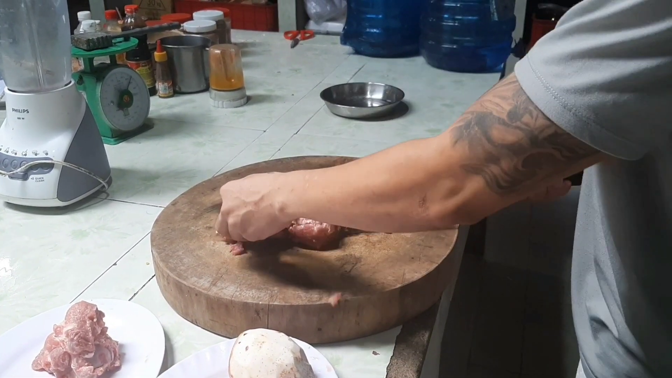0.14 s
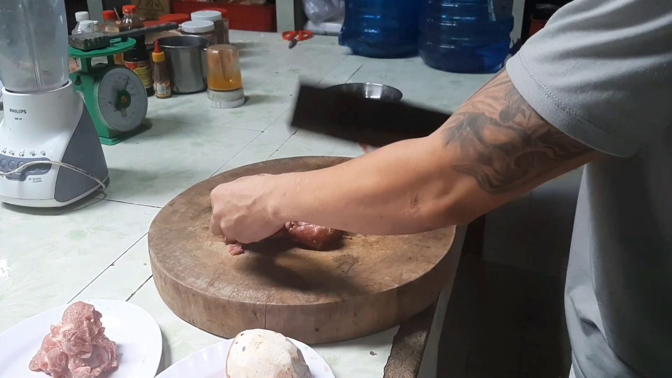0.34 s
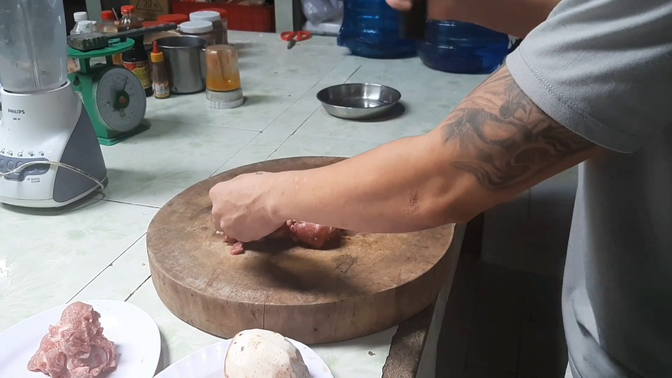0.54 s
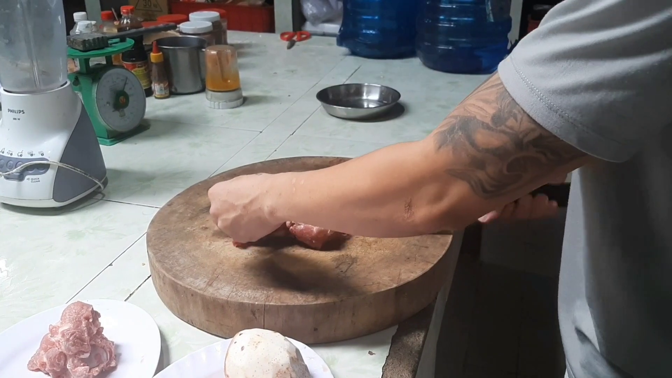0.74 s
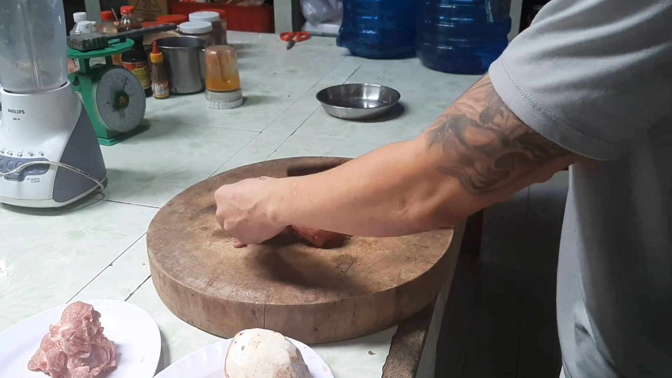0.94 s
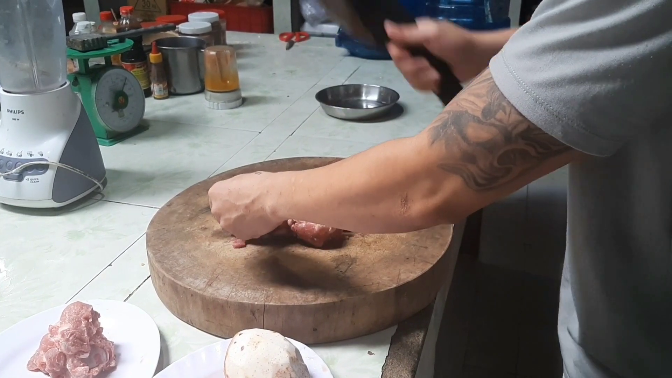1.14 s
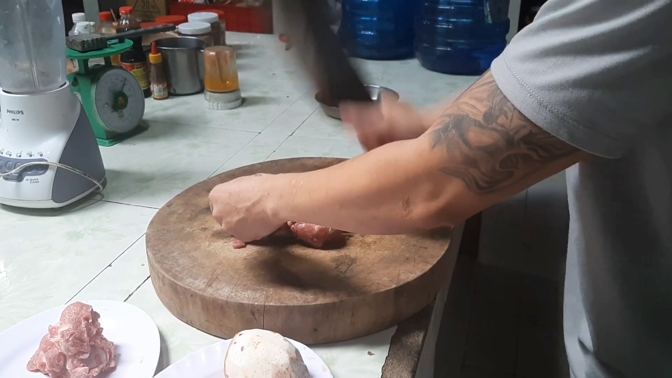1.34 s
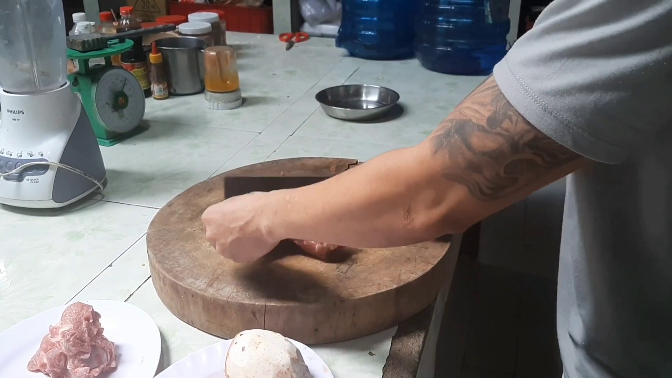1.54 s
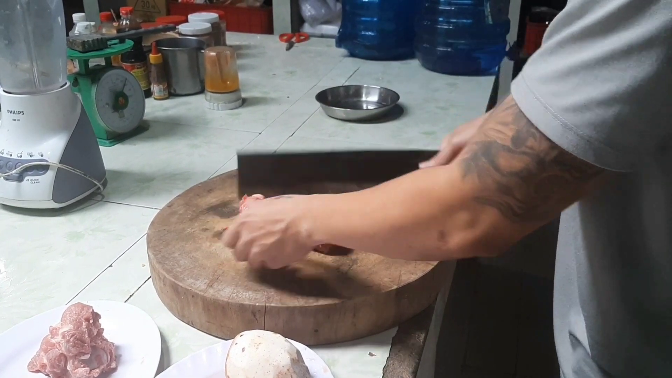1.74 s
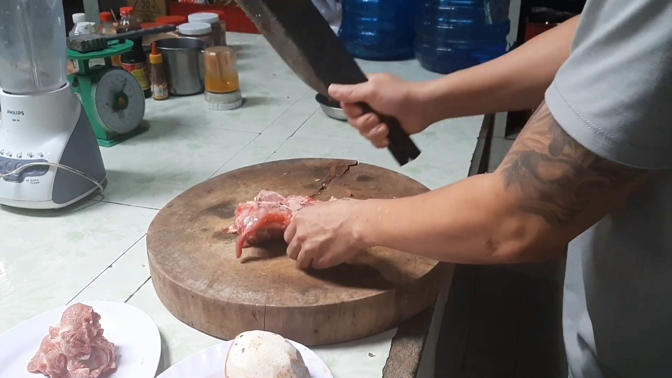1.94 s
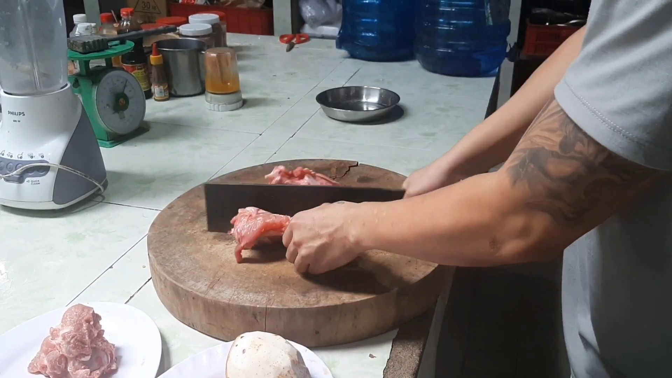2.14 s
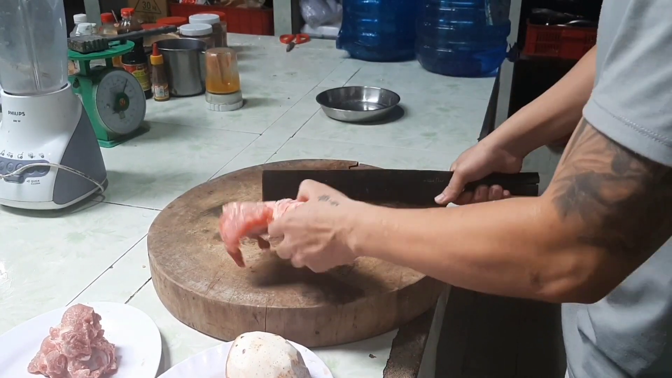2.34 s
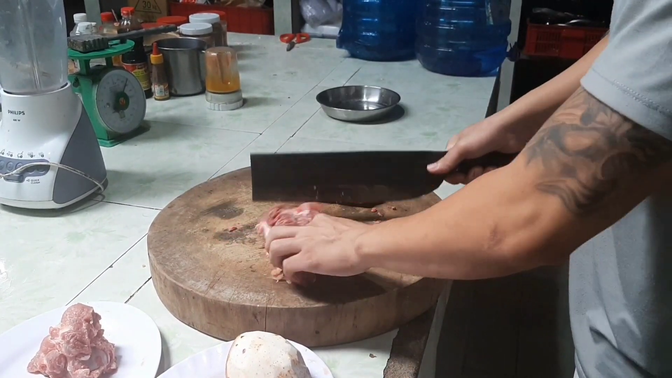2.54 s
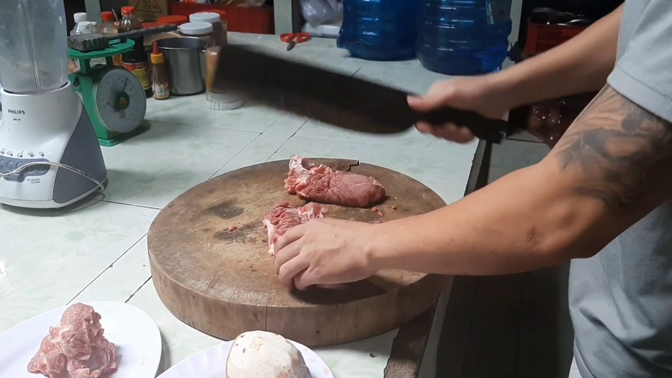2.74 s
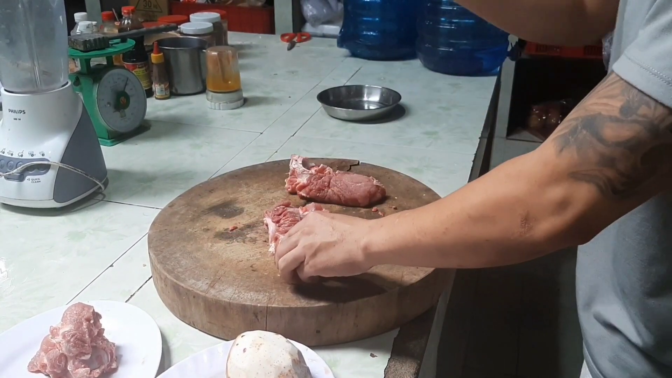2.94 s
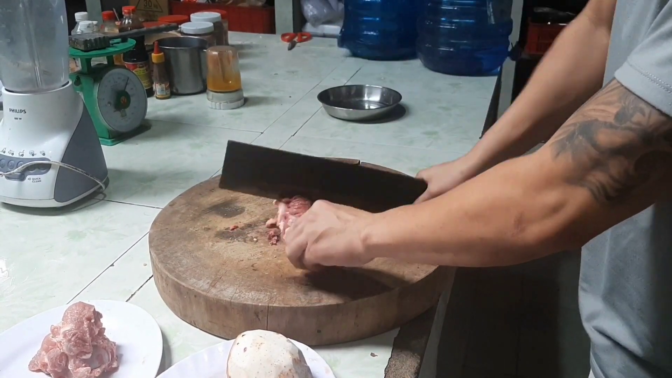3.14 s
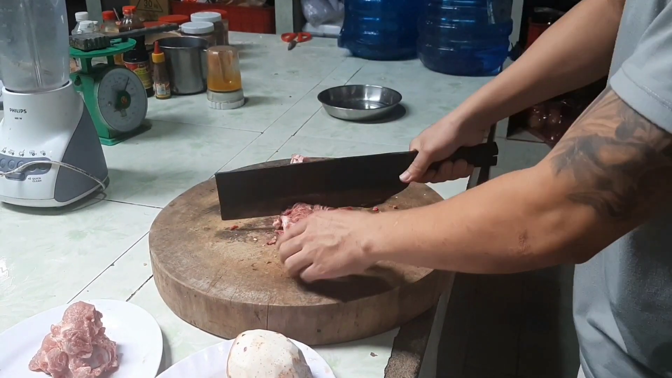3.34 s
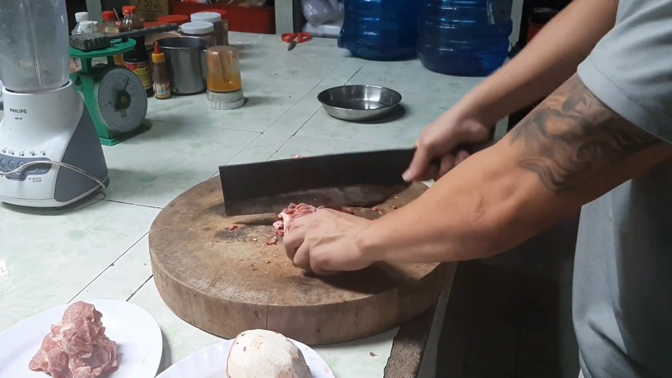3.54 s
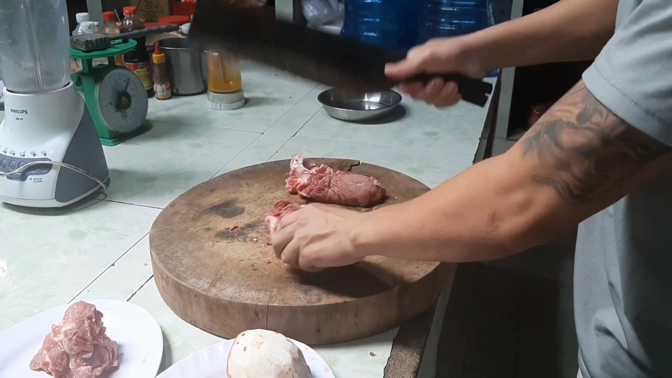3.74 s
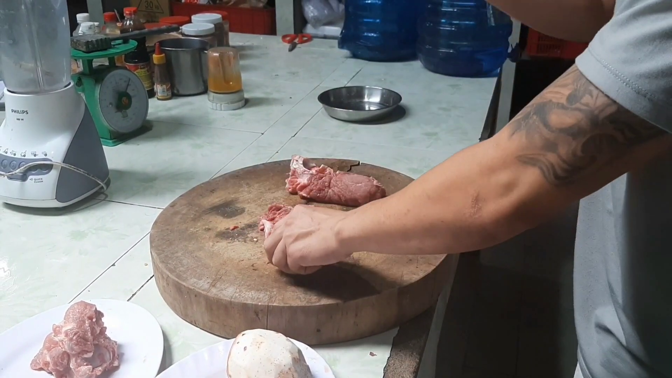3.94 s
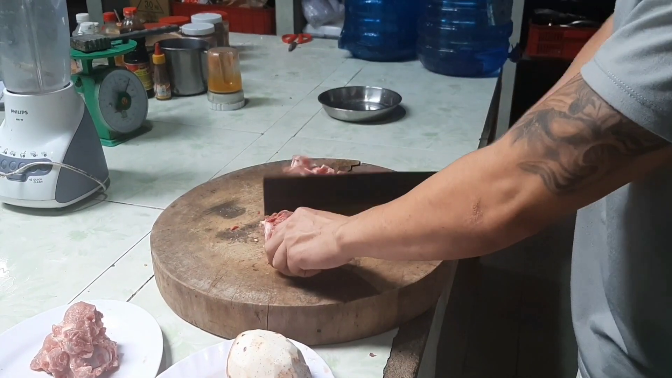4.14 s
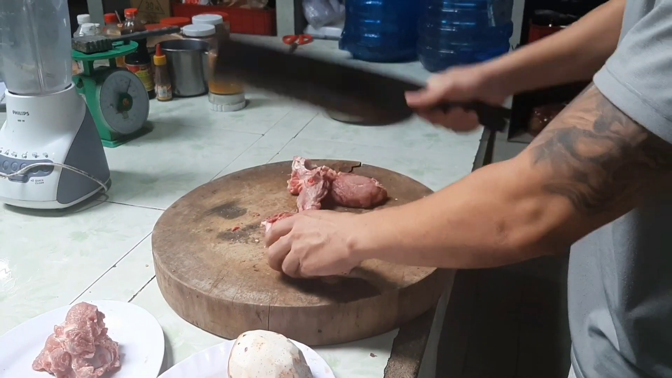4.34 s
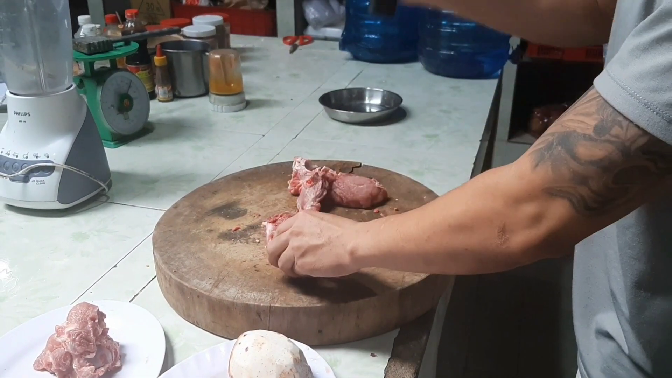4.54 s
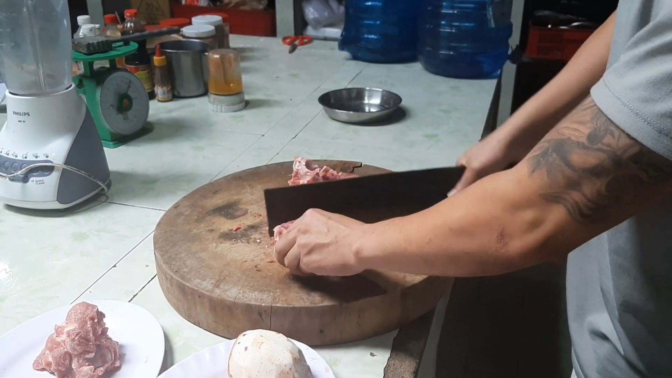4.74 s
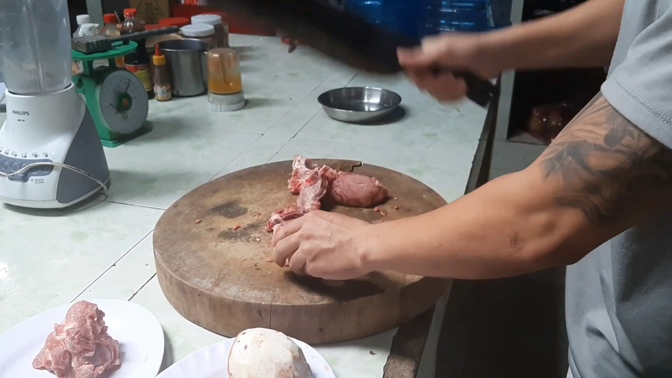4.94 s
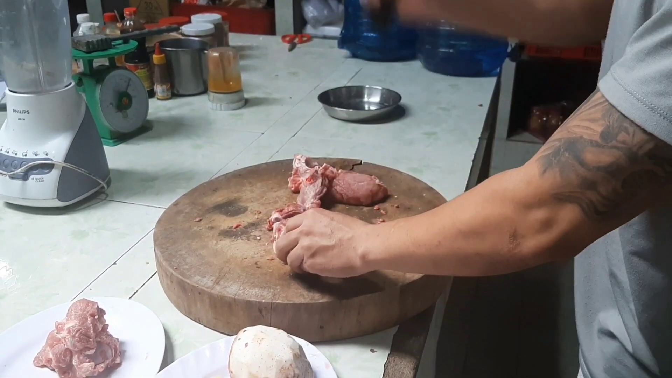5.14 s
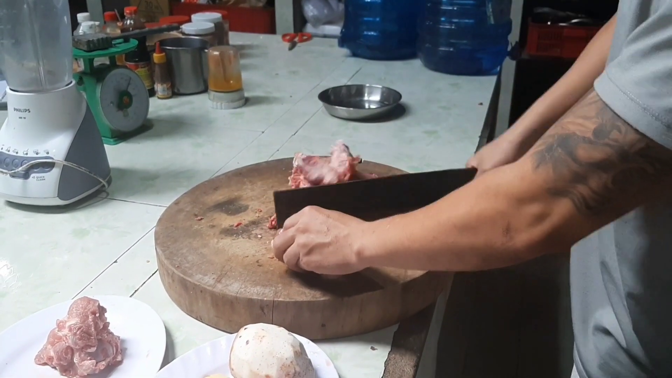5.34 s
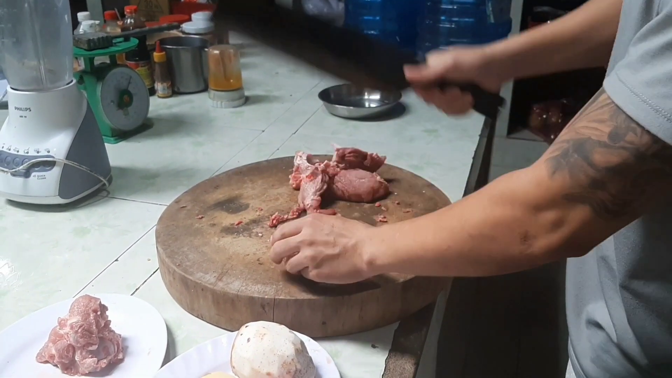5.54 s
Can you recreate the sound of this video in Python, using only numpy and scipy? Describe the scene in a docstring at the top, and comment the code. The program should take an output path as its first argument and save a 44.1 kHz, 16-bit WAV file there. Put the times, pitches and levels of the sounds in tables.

```python
"""A tiled kitchen: a heavy cleaver chops bone on a thick wooden block, close to a phone on the counter.
Each blow is a burst of noise as the bone cracks, then decaying modes as the edge knocks the block.
Filtered noise, one echo pattern per blow, lets the hard walls ring on for about half a second.
Small wet noise ticks follow one blow; behind lie a fan's wavering hum, its hiss, and the rumble
and short sine thumps of its draught on the two microphone ports."""
import sys
import numpy as np
from scipy import signal
from scipy.fft import rfft, irfft
from scipy.io import wavfile
from scipy.ndimage import uniform_filter1d

SR = 44100
rng = np.random.default_rng(int(sys.argv[2]) if len(sys.argv) > 2 else 0)


def generate_wav(sig):
    """Save sig (samples, or channels by samples) to the path in sys.argv[1] as 16-bit PCM at SR."""
    pcm = np.round(np.clip(np.atleast_2d(sig).T, -1, 1) * 32767).astype(np.int16)
    wavfile.write(sys.argv[1], SR, pcm)


N = 250488

# blows of the cleaver: (edge meets bone [s], crack level [dB], crack length [ms], crack tilt [dB/octave],
#   edge meets block after [ms], weight of blow [dB], knock pitch [ratio],
#   knock level near [dB], knock level to walls [dB], body level [dB],
#   thud level near [dB], thud level to walls [dB], thud tilt [dB/octave],
#   blade level [dB], upper blade modes [dB])
CHOPS = [(0.1334, -12, 1, -1.1, 3.83, -14, 1.01, -4.5, -16.5, -18, -49.5, -36, -10, -40.5, -10),
         (0.8031, -17.5, 4.9, -0.6, 4.2, -15.5, 0.96, -5, -27.5, -9, -31, -33, -5.5, -37.5, -6.5),
         (1.5005, -15, 3.75, -0.5, 6, -17.5, 1.05, -6.5, -32, -3.5, -33, -32.5, -3, -50, -4),
         (2.1808, -21, 7.5, -2.8, 6.7, -17, 1.016, -6.5, -11, -14, -25, -32.5, 0, -39, -15),
         (3.2318, -20, 3.9, -0.9, 0.62, -25, 0.97, -12.5, -46, -15.5, -11, -23.5, -4, -58, -7),
         (4.206, -11, 2.8, -4, 2.98, -15.5, 0.79, -5, -19.5, -19, -38, -27.5, 3, -44, -14.5),
         (4.7695, -13, 3.8, -3, 0.86, -14, 0.93, -4.5, -35, -10.5, -22, -24.5, 8.5, -57, 4),
         (5.3435, -13.5, 3.4, 0.2, 3.26, -15.5, 1, -4.5, -26.5, -11, -26, -32, -7, -41, -6.5),
         (5.4160, -22, 3.1, -1, 0.55, -26.5, 0.97, -1, -17, -23, -52, -39, -12, -63, 13)]


def chops():
    """Superposition: crack, block and counter reach the ports directly, then the walls return the blow."""
    out = np.zeros((2, N))
    for (s, crack_db, crack_ms, tilt_db, wait_ms, blow_db, pitch, knock_db, wall_knock_db, body_db,
         thud_db, wall_thud_db, thud_tilt_db, blade_db, upper_db) in CHOPS:
        wait_s = wait_ms / 1000
        modes = block_modes(pitch, tilt_db, thud_tilt_db)
        crack = bone_crack(crack_db, crack_ms / 1000, tilt_db)
        wood = block(modes, [knock_db, body_db, thud_db], wait_s)
        add(out, crack + wood, s)
        add(out, counter(blow_db), s)
        reflected = walls(modes, tilt_db, blow_db, wall_knock_db, wall_thud_db, blade_db, upper_db)
        add(out, reflected, s + wait_s)
    return out


# relative spectrum of the splintering bone: (frequency [Hz], level [dB per Hz])
CRACK = [(240, -35.5), (400, -4), (1760, -4), (3930, -9.5), (5110, -8), (7870, -16), (9180, -24),
         (10900, -14.5), (12700, -10), (14800, -10.5), (16000, -36)]
CRACK_RISE_S, GRIT_T60_S = .0015, 0.029


def bone_crack(level_db, length_s, tilt_db):
    """Fracture noise: bone splinters while the edge travels through it, then the grit dies fast."""
    t = np.arange(16384) / SR
    rise = np.clip(t / CRACK_RISE_S, 0, 1)
    decay = undb(-60 * np.maximum(t - length_s, 0) / GRIT_T60_S)
    return diffuse(len(t), CRACK, tilt_db) * rise * decay * undb(level_db)


# modes of the block, its main knock and the modes beside it: (frequency [Hz], level [dB], t60 [s])
KNOCK, KNOCK_SIDES = [(1526, 0.0076, 0.021)], [(1075, -4, 0.015), (1920, -8, 0.026), (2460, -2.5, 0.011)]
# body modes of the block and counter: (frequency [Hz], level [dB], t60 [s])
BODY = [(360, -15, 0.052), (458.5, -4.5, 0.068), (624, -2, 0.035), (890, -3, 0.012)]
# low thud modes of the block and counter: (frequency [Hz], level [dB], t60 [s])
THUD = [(101.7, -8, 0.2), (183.8, -1.5, 0.15), (216, -2, 0.11), (267, -2, 0.072)]
KNOCK_SIDES_DB = -4.3
# the duller the crack, the more the upper body modes sound
BODY_TILT_DB, BODY_TILT_PER_CRACK_TILT = -1.5, -3.5  # dB per octave; ratio


def block_modes(pitch, crack_tilt_db, thud_tilt_db):
    """Modal excitation: each blow weights the knock, body and thud modes anew."""
    knock = shift(KNOCK, pitch) + shift(KNOCK_SIDES, pitch, KNOCK_SIDES_DB)
    body = shift(BODY, tilt_db=BODY_TILT_DB + BODY_TILT_PER_CRACK_TILT * crack_tilt_db)
    thud = shift(THUD, tilt_db=thud_tilt_db, about_hz=184)
    return knock, body, thud


RIGHT_LAG_SAMPLES = 3


def block(modes, levels_db, wait_s):
    """Modal decay: the struck block rings in damped modes, reaching the right port a little later."""
    late = np.arange(16384) / SR - wait_s
    parts = [ring(part, late, rise_s=rise_s) for part, rise_s in zip(modes, (.0005, .001, .004))]
    wood = undb(levels_db) @ parts
    return np.array([wood, np.roll(wood, RIGHT_LAG_SAMPLES)])


# long modes of the counter: (frequency [Hz], level [dB], t60 [s])
COUNTER = [(345, -36, .45), (443, -34, .4), (616, -30, .42), (1486, -42, .6), (1550, -41, .4)]
COUNTER_DB = 20.5  # against the weight of the blow


def counter(blow_db):
    """Lightly damped resonance: the counter builds up slowly and rings long."""
    t = np.arange(32768) / SR
    return undb(blow_db + COUNTER_DB) * ring(COUNTER, t, detune=.002, rise_s=.01)


# modes of the blade, main and upper: (frequency [Hz], level [dB], t60 [s])
BLADE, BLADE_UPPER = [(4795, 0, .12)], [(5150, 2, .12), (5650, -5, .07), (5850, -6, .07)]
# relative spectrum of the crack heard from all round: (frequency [Hz], level [dB per Hz])
SPREAD = [(88, -26.5), (150, -41), (448, -5.5), (555, -0.5), (612, -10), (888, -14), (1360, -9.5),
          (1530, -6.5), (4160, -14.5), (4950, -15), (7920, -19), (8730, -22.5), (14500, -12),
          (16000, -46.5)]
WALL_CRACK_DB, WALL_BODY_DB = 12, 0.23  # against the weight of the blow
WALL_HOLD = .4  # share of the block's ring time


def walls(modes, tilt_db, blow_db, knock_db, thud_db, blade_db, upper_db):
    """Power summation: over all directions resonances blur into humps and the parts add as powers."""
    t = np.arange(16384) / SR
    blurred = [abs(rfft(ring(shift(part, hold=WALL_HOLD), t))) for part in modes]
    blade = abs(rfft(ring(BLADE + shift(BLADE_UPPER, db=upper_db), t, detune=.001)))
    spread = colour(len(t), SPREAD, .5 * tilt_db)
    spread = spread / np.sqrt(np.mean(spread ** 2))
    levels_db = [blow_db + WALL_CRACK_DB, knock_db, blow_db + WALL_BODY_DB, thud_db, blade_db]
    power = undb(levels_db) ** 2 @ np.square([spread, *blurred, blade])
    pulse = causal(np.sqrt(power))
    # arm and meat stand elsewhere at every blow, so each one finds its own pattern of echoes
    return signal.fftconvolve(pulse[None], kitchen(), axes=1)


# reverberation of the room: (frequency [Hz], t60 [s], relative level [dB])
ROOM = [(46.2, 1, -12), (90, 0.47, -2), (203.5, 0.55, -3.5), (608, 0.54, 2.5), (1443, 0.61, 7),
        (4000, 0.6, 5), (8600, 0.54, 2.5), (15400, 0.49, -7.5)]
ROOM_FIRST_S, ROOM_FILL_S = 0.00092, 0.014  # onset delay, time constant of the build-up
ROOM_DB, ROOM_PATCHY_DB = 11.5, 1.2  # total level, depth factor of the clumps


def kitchen(size=32768):
    """Reverberant decay: reflections fill in, arrive in clumps, then die away band by band."""
    t, hz = np.arange(size) / SR, np.fft.rfftfreq(size, 1 / SR)
    noise, out = rfft(diffuse(size, [(1, 0), (2, 0)])), 0
    for centre in 45 * 2 ** np.arange(0, 9, .5):  # overlapping half-octave steps
        band = np.clip(1 - 2 * abs(np.log2((hz + 1) / centre)), 0, 1)
        decay_db = -60 * t / read(ROOM, centre)
        fade_db = read(ROOM, centre, order=2) + decay_db + ROOM_PATCHY_DB * walk(78.6, size)
        out = out + irfft(noise * band, size) * undb(fade_db)
    out *= 1 - np.exp(-np.maximum(t - ROOM_FIRST_S, 0) / ROOM_FILL_S)
    return out * undb(ROOM_DB) / np.sqrt((out ** 2).sum(axis=1).mean())


# small wet ticks as the meat is pulled aside: (time [s], level [dB])
TICKS = [(2.624, -64.5), (2.6614, -48.5), (2.6784, -54.5)]


def ticks():
    """Impulsive noise: each tick is a bright burst with an exponential decay."""
    out, t = np.zeros((2, N)), np.arange(SR // 50) / SR
    bright = [(2000, -15), (6500, 5), (9500, -7.5), (14000, 0)]  # (Hz, dB per Hz)
    for s, db in TICKS:
        add(out, undb(db) * diffuse(len(t), bright) * undb(-60 * t / 0.024), s)
    return out


# relative spectrum of the draught's rumble: (frequency [Hz], level [dB per Hz])
DRAUGHT = [(15, -21.5), (30, -8), (60, -4), (100, -4.5), (160, -10.5), (250, -16.5), (450, -38),
           (2000, -77)]
DRAUGHT_DB = -60


def draught():
    """Turbulence noise: the rumble is unrelated at the two ports, and its level wanders."""
    ports = [diffuse(N, DRAUGHT)[0] * undb(DRAUGHT_DB + 6.4 * walk(20)) for _ in range(2)]
    return np.array(ports)


# the loudest draught thumps on the ports: (time [s], nominal peak level [dB], frequency [Hz])
PUFFS = [(0.039, -24.5, 71.7), (0.075, -35, 96), (1.8, -34.5, 134), (1.888, -41, 62.6), (2.86, -42, 56.5),
         (3.359, -30.5, 63), (3.617, -35, 76.7), (3.777, -34, 86.1), (3.867, -37, 117), (3.909, -33.5, 61),
         (3.959, -39, 64.6), (4.019, -32.5, 99.6), (4.055, -39, 145), (4.147, -30, 91), (4.599, -45, 73.8),
         (4.697, -39.5, 150), (5.169, -41, 88)]
SOFT_PUFFS, SOFT_PUFF_HZ = 18, 92  # count, middle frequency
SOFT_PUFF_DB, SOFT_PUFF_SPREAD_DB = -47.5, 6
PUFF_CYCLES, PUFF_LEFT_DB, PUFF_PAN_SPREAD_DB = 1.4, 2, 2.5


def puffs():
    """Pressure pulses: each thump is a brief windowed sine; the soft ones come at random."""
    out, t = np.zeros((2, N)), np.arange(SR // 5) / SR
    when, luck = rng.uniform(0, N / SR, SOFT_PUFFS), rng.standard_normal((SOFT_PUFFS, 2))
    soft_db = SOFT_PUFF_DB + SOFT_PUFF_SPREAD_DB * luck[:, 0]
    soft_hz = SOFT_PUFF_HZ * 2 ** (0.56 * luck[:, 1])
    for s, db, hz in [*PUFFS, *zip(when, soft_db, soft_hz)]:
        # the right port hears another phase
        phase = rng.uniform(0, 2 * np.pi) + np.array([[0], [1.2]]) * rng.standard_normal()
        pan_db = PUFF_LEFT_DB + PUFF_PAN_SPREAD_DB * rng.standard_normal()
        gain = undb(db + np.array([[pan_db], [-pan_db]]) / 2)
        swell = np.sin(np.pi * np.clip(t * hz / PUFF_CYCLES, 0, 1)) ** 2
        add(out, gain * swell * np.sin(2 * np.pi * hz * t + phase), s)
    return out


# motor tones of the fan: (frequency [Hz], rms level [dB])
HUM = [(97, -63.5), (345, -70.5), (531.5, -69.5)]


def fan_hum():
    """Tonal radiation: steady sines whose level and phase waver a little."""
    t, tones = np.arange(N) / SR, 0
    for hz, db in HUM:
        level = np.sqrt(2) * undb(db + walk(23))  # rms to peak
        tones = tones + level * np.sin(2 * np.pi * hz * t + 0.34 * walk(8.4))
    return tones


# relative spectrum of the fan's air noise: (frequency [Hz], level [dB per Hz])
AIR = [(88, -34.5), (150, -2.5), (240, -8), (309, 0.5), (475, -5.5), (524, -7.5), (837, -16.5),
       (1500, -15.5), (5150, -22), (8730, -27.5), (12400, -26.5), (14800, -32), (16000, -43.5)]
# swell of the lower part of the air noise: (time [s], level [dB])
SWELL = [(0, 9), (.6, 0), (1.2, 1.5), (1.48, 2), (2.15, 2.5), (3.0, 3), (3.6, 4.5), (4.04, 6.5), (4.7, 2),
         (5.3, 2.5), (5.68, 7.5)]
AIR_DB = -61.5


def fan_air():
    """Broadband flow noise: a steady hiss above a lower part that swells slowly and flickers."""
    air = diffuse(N, AIR) * undb(AIR_DB)
    hiss = signal.sosfilt(signal.butter(2, 800, "high", fs=SR, output="sos"), air)
    swell_db = np.interp(np.arange(N) / SR, *np.transpose(SWELL))
    return hiss + (air - hiss) * undb(swell_db + 2.5 * walk(16))


def undb(db):
    """Level law: decibels to an amplitude ratio."""
    return 10 ** (np.asarray(db) / 20)


def read(table, hz, order=1):
    """Logarithmic frequency scale: a table's column interpolated along it."""
    rows = np.array(table, float)
    return np.interp(np.log(hz + 1), np.log(rows[:, 0]), rows[:, order])


def colour(size, table, tilt_db=0.):
    """Spectral shaping: gain per frequency bin, tilted about 3 kHz in dB per octave."""
    hz = np.fft.rfftfreq(size, 1 / SR)
    return undb(read(table, hz) + tilt_db * np.log2((hz + 100) / 3000))


PORT_GAP_M = .15


def diffuse(size, table, tilt_db=0.):
    """Diffuse-field coherence: noise at two ports, alike in the bass, unrelated in the treble; rms 1."""
    hz = np.fft.rfftfreq(size, 1 / SR)
    alike = .9 * np.sinc(2 * hz * PORT_GAP_M / 343)  # speed of sound in m/s
    noise = rfft(rng.standard_normal((2, size))) * colour(size, table, tilt_db)
    mid, side = noise * np.sqrt([1 + alike, 1 - alike])
    pair = irfft([mid + side, mid - side], size)
    return pair / pair.std()


def walk(rate, size=N):
    """Smoothed random process: values held 1 / rate s and slewed twice; spread near 1.5."""
    k = int(SR / rate)
    held = np.repeat(rng.standard_normal(size // k + 1), k)
    return 2.01 * uniform_filter1d(uniform_filter1d(held, k), k)[:size]


def ring(modes, t, spread_db=1., detune=.01, rise_s=.0006):
    """Modal superposition: damped sines from t = 0; every blow shares its energy anew."""
    hz, db, t60 = np.array(modes, float).T[:, :, None]
    luck = rng.standard_normal((2, len(modes), 1))
    t = np.maximum(t, 0)
    level = undb(db + spread_db * luck[1] - 60 * t / t60)
    waves = np.sin(2 * np.pi * hz * (1 + detune * luck[0]) * t) * level
    return waves.sum(axis=0) * (1 - np.exp(-t / rise_s))


def shift(modes, pitch=1., db=0., tilt_db=0., hold=1., about_hz=500):
    """Modal scaling: the same modes at another pitch, level, tilt per octave or share of ring time."""
    return [(pitch * hz, level + db + tilt_db * np.log2(hz / about_hz), hold * t60)
            for hz, level, t60 in modes]


def causal(gain):
    """Minimum phase: the shortest pulse with this gain that starts at zero, folded from the cepstrum."""
    fold = irfft(np.log(gain + 1e-9))
    fold[1:len(gain) - 1] *= 2
    fold[len(gain):] = 0
    return irfft(np.exp(rfft(fold)))


def add(out, x, s):
    """Linear superposition: mix x into out from time s."""
    a = int(s * SR)
    out[..., a:a + x.shape[-1]] += x[..., :out.shape[-1] - a]


def scene():
    """Superposition of all sources, from the cleaver to the fan."""
    return chops() + ticks() + draught() + puffs() + fan_hum() + fan_air()


MIC_LOW_HZ, TOP_HZ = 56, 15400


def record(dry):
    """Band limiting and saturation: the phone drops deep bass, rounds loud peaks and cuts the top."""
    thin = signal.sosfilt(signal.butter(2, MIC_LOW_HZ, "high", fs=SR, output="sos"), dry)
    rounded = np.tanh(0.73 * thin) / 0.51
    return signal.sosfilt(signal.ellip(10, .2, 80, TOP_HZ, fs=SR, output="sos"), rounded)


dry = scene()
out = record(dry)
generate_wav(out)
```